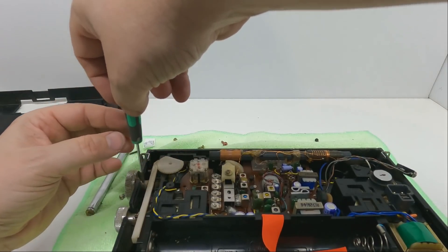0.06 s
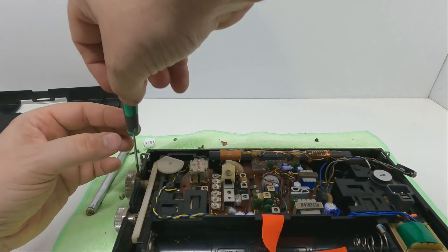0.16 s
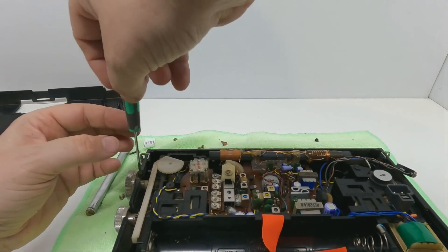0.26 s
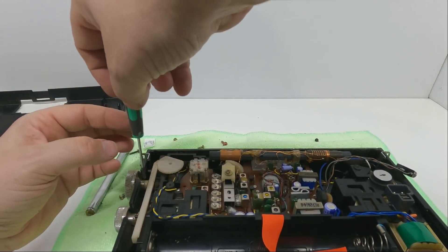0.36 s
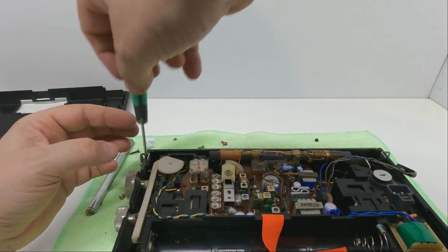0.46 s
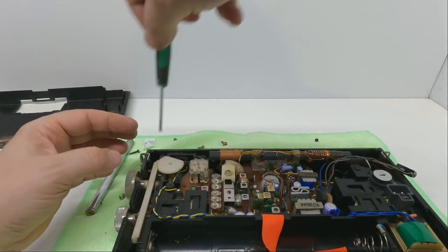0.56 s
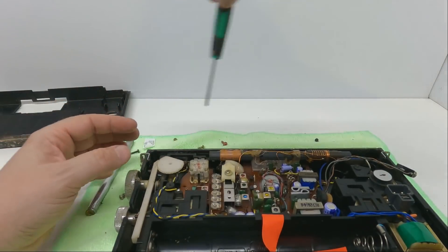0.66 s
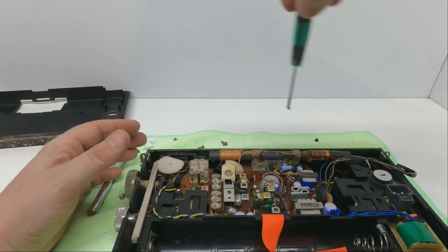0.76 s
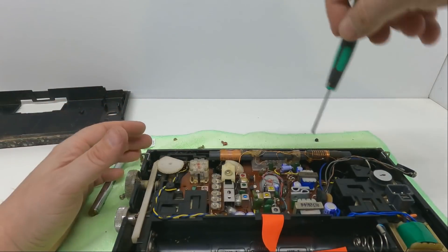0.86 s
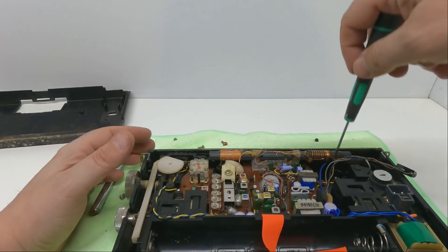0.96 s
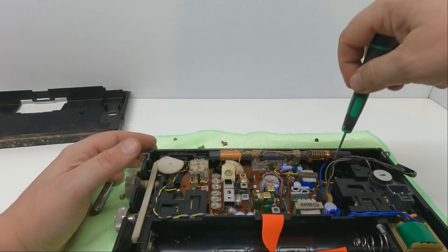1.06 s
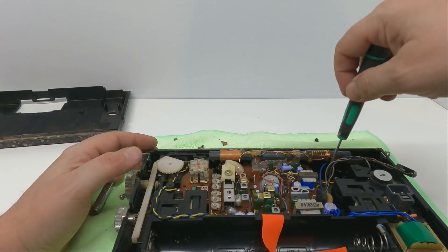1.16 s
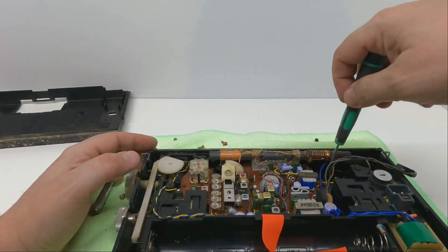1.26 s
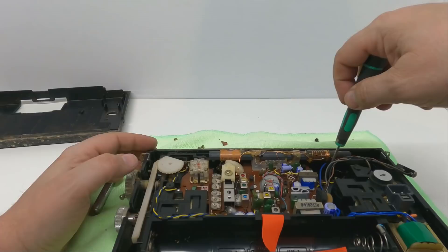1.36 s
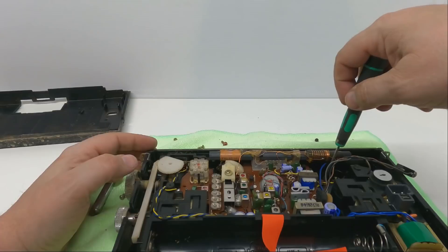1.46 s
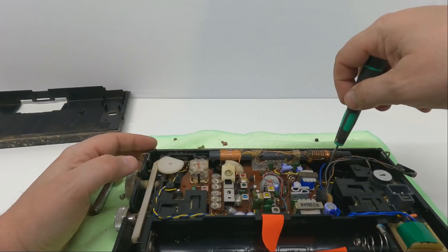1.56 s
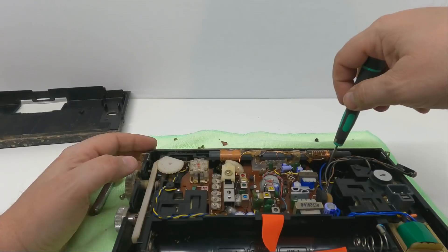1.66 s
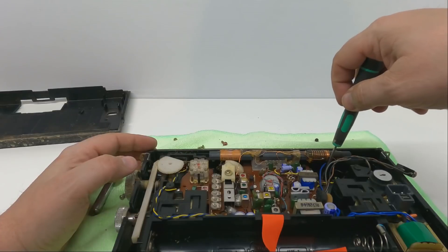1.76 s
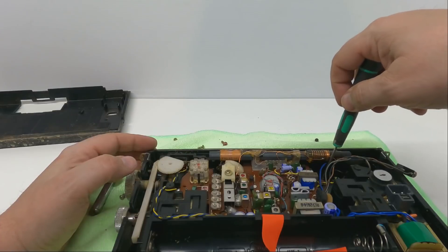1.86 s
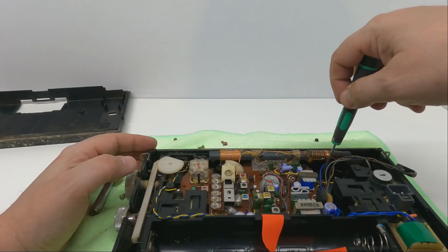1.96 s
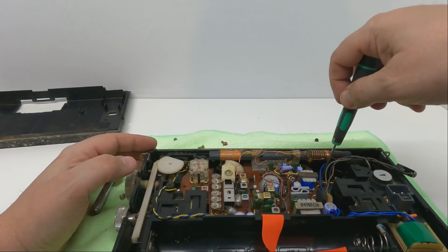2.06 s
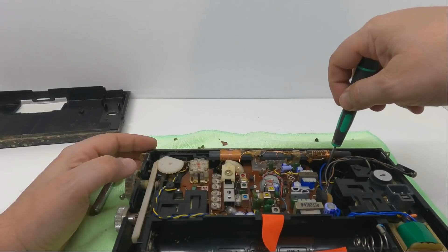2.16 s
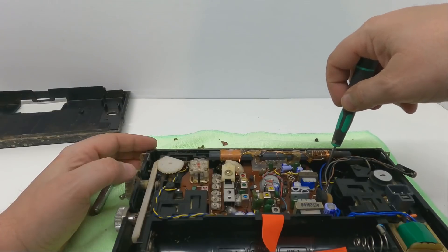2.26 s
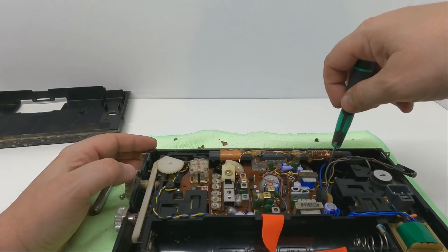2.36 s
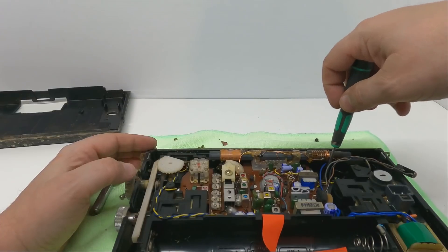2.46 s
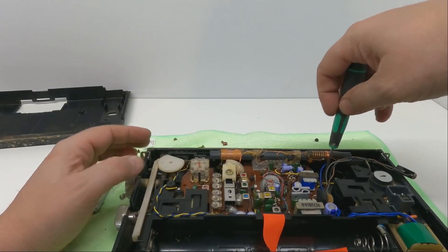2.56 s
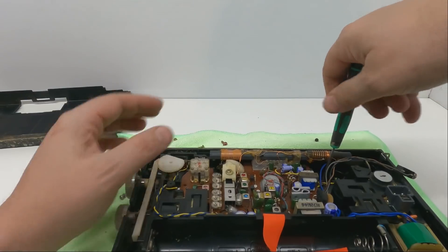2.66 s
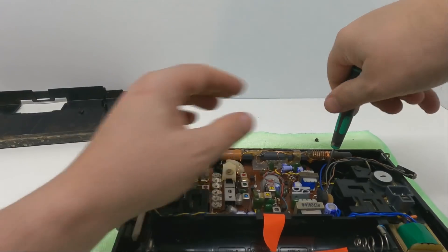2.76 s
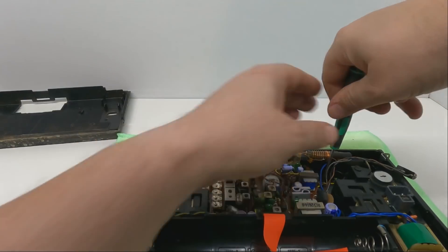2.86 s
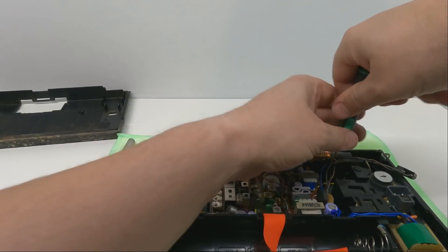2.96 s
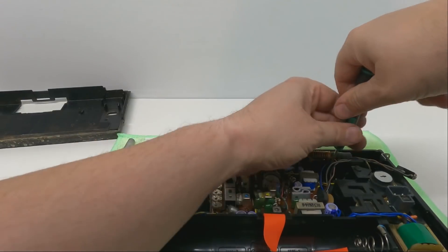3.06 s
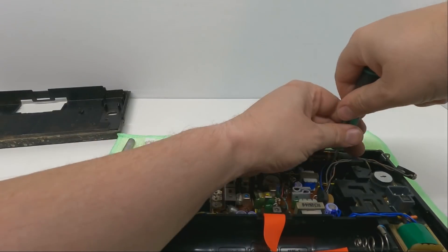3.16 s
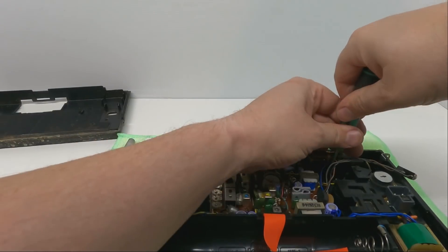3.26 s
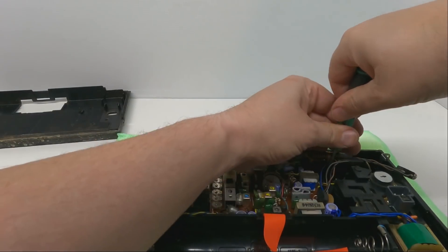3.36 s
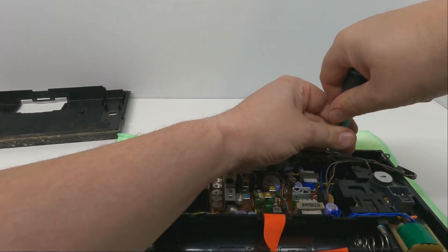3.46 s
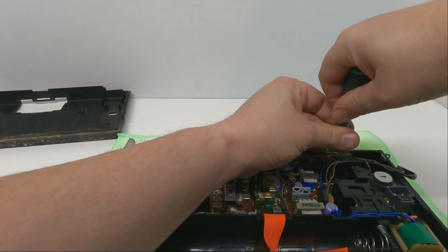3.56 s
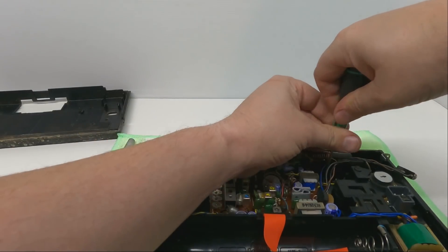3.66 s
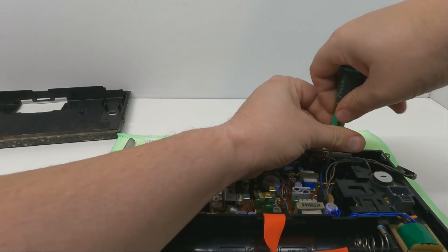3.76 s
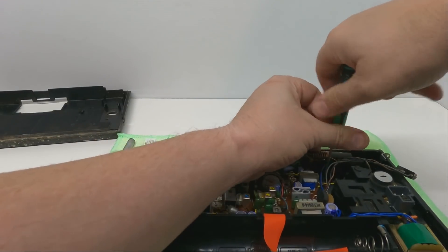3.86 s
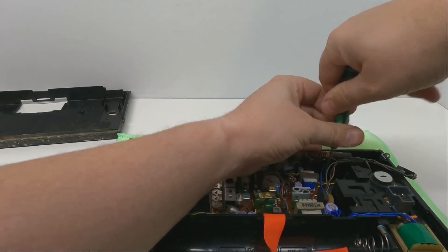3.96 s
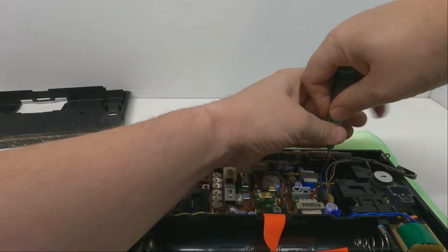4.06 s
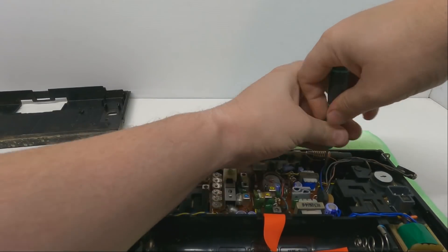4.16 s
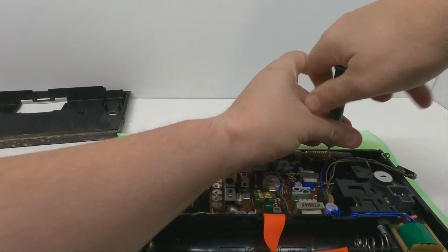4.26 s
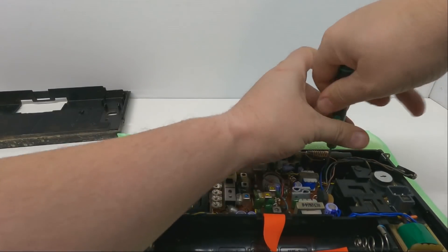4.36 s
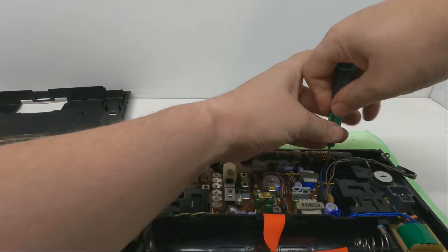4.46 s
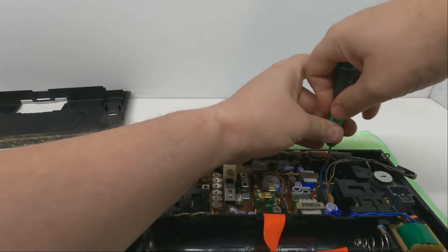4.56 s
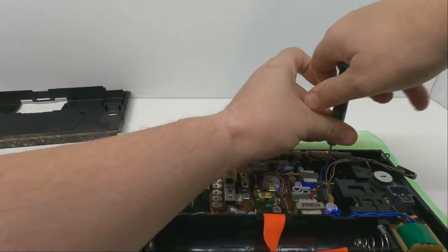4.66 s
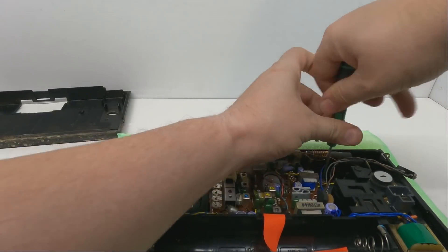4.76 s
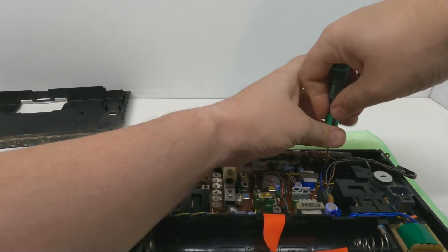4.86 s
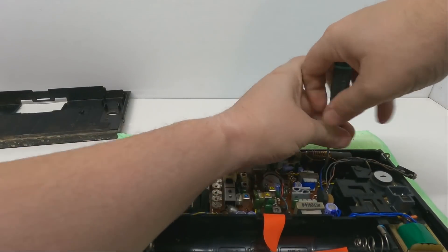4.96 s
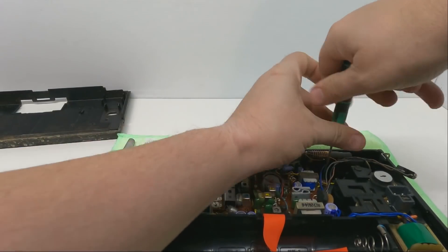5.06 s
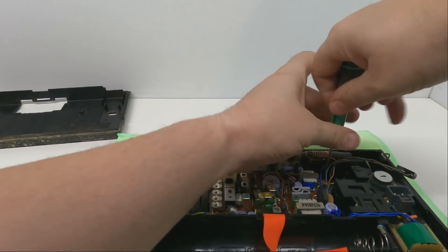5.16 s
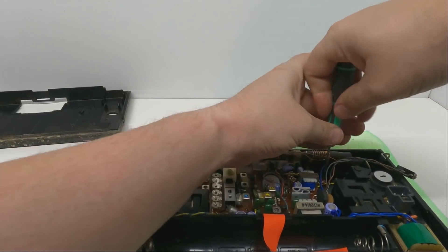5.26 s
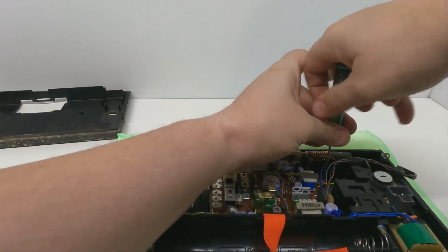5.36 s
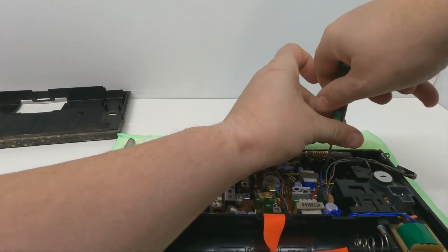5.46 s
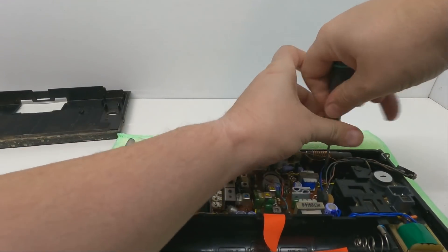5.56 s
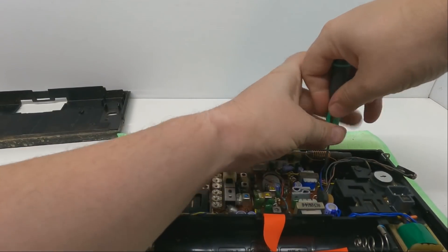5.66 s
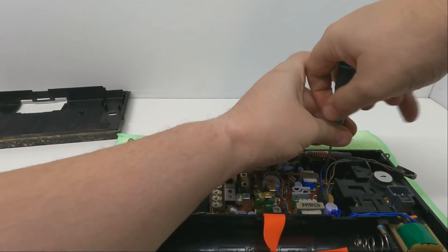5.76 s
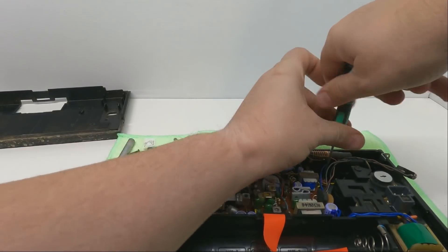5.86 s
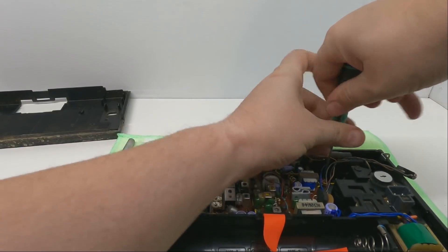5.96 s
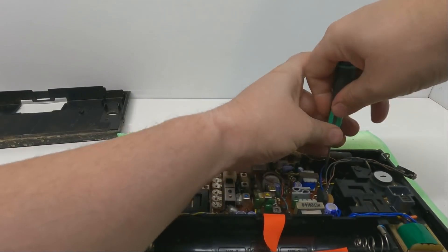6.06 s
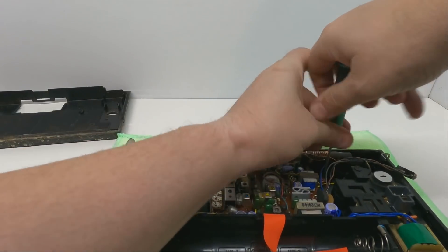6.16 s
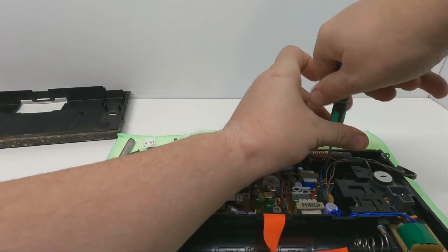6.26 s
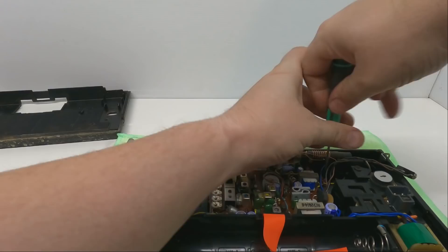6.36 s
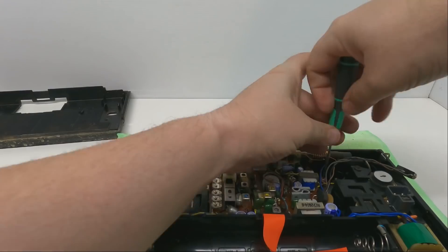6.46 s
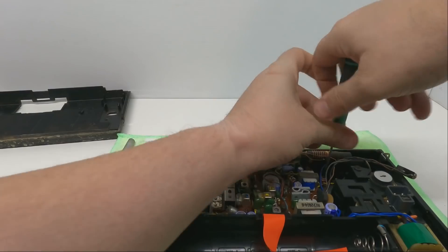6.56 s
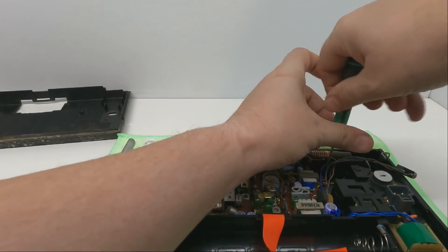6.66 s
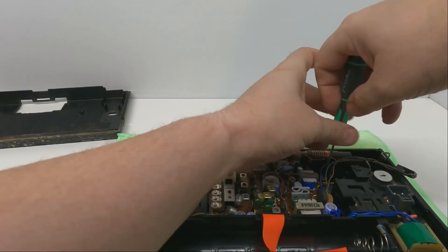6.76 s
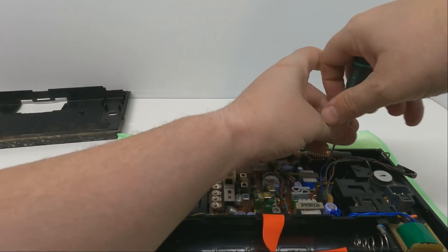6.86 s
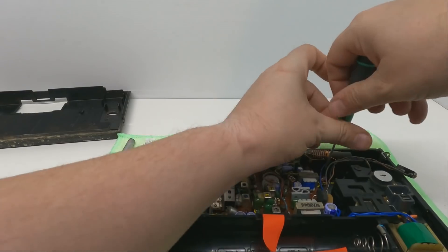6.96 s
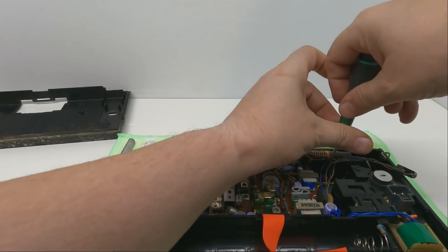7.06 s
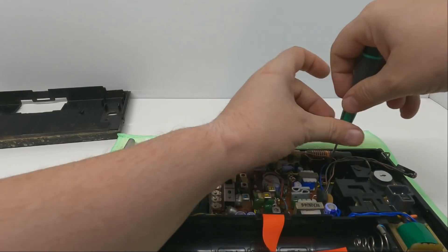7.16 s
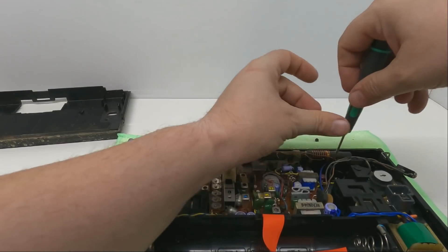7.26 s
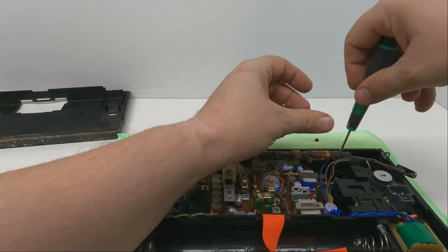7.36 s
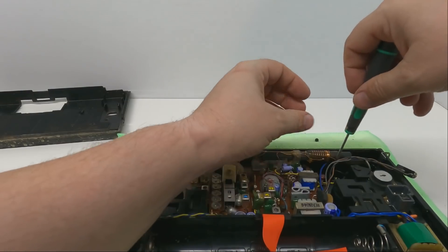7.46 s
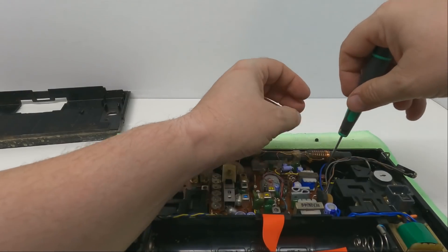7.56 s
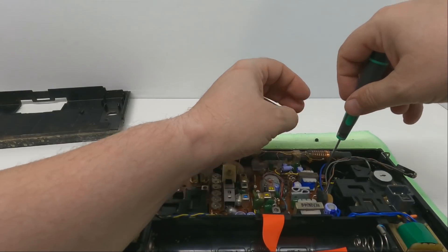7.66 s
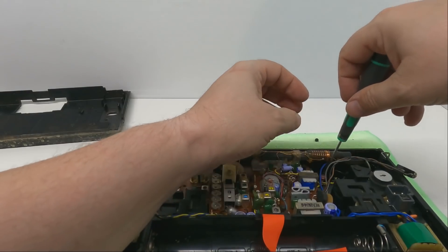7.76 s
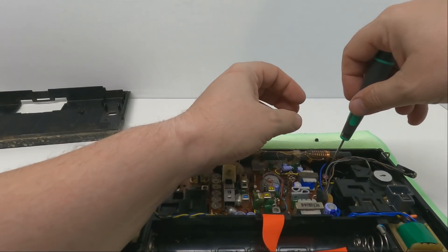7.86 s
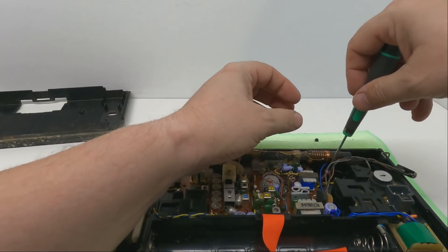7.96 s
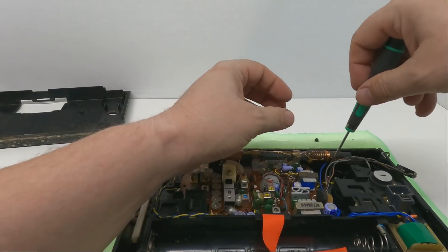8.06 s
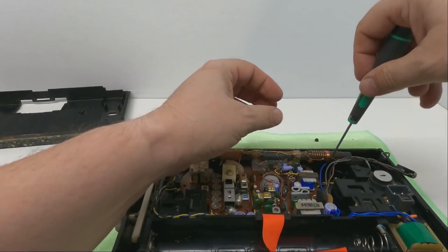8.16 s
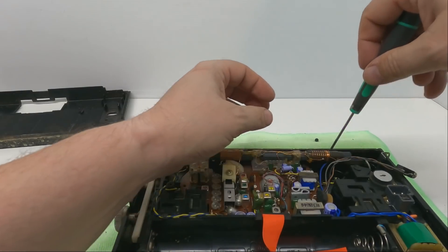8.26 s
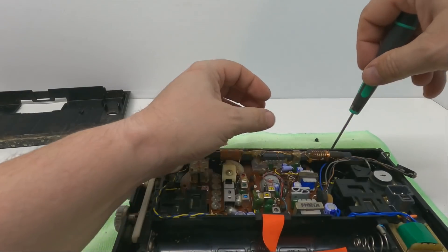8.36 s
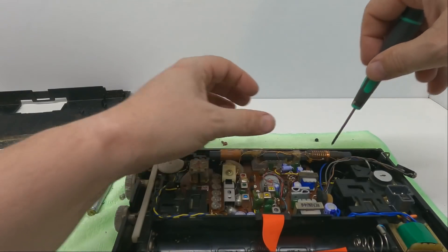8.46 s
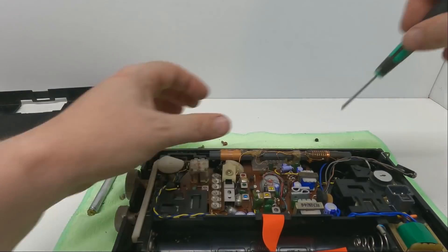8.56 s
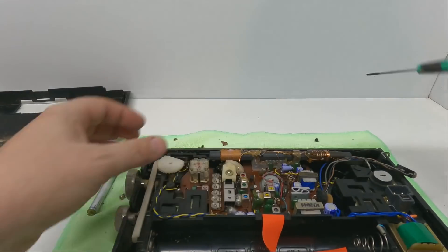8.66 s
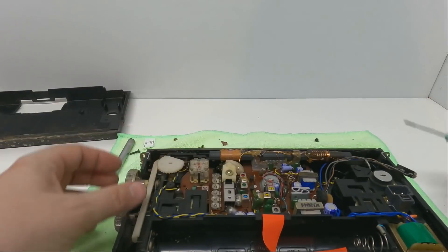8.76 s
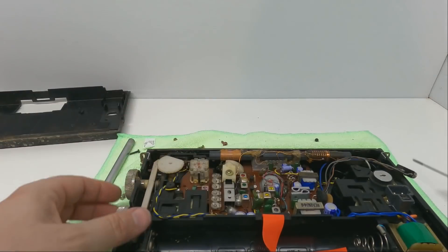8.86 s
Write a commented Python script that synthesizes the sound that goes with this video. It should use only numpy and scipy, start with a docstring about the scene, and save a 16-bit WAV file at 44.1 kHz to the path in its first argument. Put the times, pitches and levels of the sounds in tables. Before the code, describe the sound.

A screwdriver works on an opened plastic radio. A quick cluster of bright metal clinks comes first, then near quiet, a few hollow plastic knocks and two hard cracks. Soft rhythmic finger rubs on the handle follow with faint ticks, dull bumps and one strong clattering knock midway. The rubbing stops, then a short burst of clinks. Close microphone in a small dry room with low drone and hiss.

```python
"""Screwdriver on an opened plastic radio

The blade clinks on small metal parts and knocks the hollow case: short forces drive banks of resonances.
Gritty squeaks and scrapes ring from random impulses; finger strokes are coloured noise and dense tiny slips.
The case shifts and drags on its mat, and struck parts sing on as beating pairs of sines.
A small dry room adds noise-built reflections; behind lie a low drone, hiss, a wavering hum, faint whistles."""
import sys
import numpy as np
from scipy import signal
from scipy.fft import rfft, irfft, next_fast_len
from scipy.io import wavfile
from scipy.ndimage import uniform_filter1d

SR = 44100
rng = np.random.default_rng(int(sys.argv[2]) if len(sys.argv) > 2 else 0)


def transcribe(u):
    """Save the signal u as a 16-bit wav file named by the first command-line argument.

    u: samples, shape (n,) or (channels, n), limited to [-1, 1]; the rate is SR.
    q: integer samples, one column per channel.
    """
    v = np.clip(np.atleast_2d(u).T, -1, 1)
    q = np.round(v * 32767).astype(np.int16)
    wavfile.write(sys.argv[1], SR, q)


N = 392931

# Levels marked nominal get a further trim or wander where they are used.
# room drone: (frequency [Hz], relative density [dB per Hz])
DRONE_SPECTRUM = [(12, -56.5), (20, -29), (48, -17), (60, -10), (81, -2), (94, -2), (103, -19.5),
                  (161, -10.5), (204, -19.5), (233, -18), (386, -24.5), (544, -36), (700, -55), (910, -70),
                  (1540, -120)]
# room hiss: (frequency [Hz], relative density [dB per Hz])
HISS_SPECTRUM = [(400, 7), (700, 0), (900, -1), (1150, 5), (1550, 5), (2200, -4.5), (3400, -12),
                 (4800, -7.5), (7000, -13), (8600, -24), (12000, -34.5), (15000, -38.5)]
# distant motor hum, each line wavering slowly: (frequency [Hz], rms level [dB])
HUM_LINES = [(77, -52.5), (154, -62.5), (192, -69)]
# background whistles: (time [s], length [s], start pitch [Hz], end pitch [Hz], nominal level [dB])
WHISTLES = [(0.0, .12, 5700, 5650, -83), (1.44, .22, 4450, 4850, -83), (1.55, .22, 5520, 5700, -84.5),
            (1.7, .2, 4700, 4550, -82.5), (2.2, .24, 4620, 4500, -81), (2.55, .15, 4470, 4650, -78),
            (2.56, .14, 5750, 6100, -74), (6.53, .12, 4600, 4500, -68), (6.58, .17, 5700, 6050, -72),
            (7.63, .22, 5700, 5750, -79), (8.46, .19, 4610, 4850, -72), (8.5, .17, 5830, 6100, -69)]
# light rubbing between strokes, and the fading rattle after the opening clinks:
# (time [s], nominal treble level [dB])
RUSTLE_CURVE = [(0.0, -91.5), (0.2, -97.5), (0.35, -76), (0.54, -83), (1.66, -94), (2.3, -92), (2.87, -78),
                (3.74, -82.5), (4.16, -70), (4.66, -78), (5.0, -72.5), (5.23, -78), (5.53, -80),
                (5.81, -78), (6.04, -77), (6.99, -74), (7.41, -90), (8.23, -96.5), (8.9, -77.5)]
# case shifting under the weight of the hands: (time [s], nominal rumble level [dB])
LEAN_CURVE = [(0.0, -61.5), (0.37, -65), (1.71, -65), (2.75, -54), (3.84, -57.5), (4.29, -49.5),
              (4.91, -53), (5.28, -50), (5.43, -47.5), (5.67, -55), (6.32, -47.5), (6.59, -50),
              (6.99, -58.5), (7.91, -67), (8.6, -61), (8.9, -62)]
# finger strokes on the handle: (start [s], length [s], nominal skin level [dB], nominal tip level [dB])
STROKES = [(0.6, 0.17, -73.5, -82), (1.0, 0.35, -74, -74), (1.305, 0.085, -69, -64.5),
           (1.901, 0.12, -74, -59.5), (2.58, 0.24, -69, -57), (2.981, 0.21, -69.5, -70),
           (3.171, 0.096, -65, -67), (3.365, 0.081, -73.5, -57), (3.8, 0.28, -66.5, -59.5),
           (4.048, 0.11, -69, -57), (4.185, 0.079, -59, -54), (4.28, 0.2, -63, -53.5),
           (4.52, 0.13, -61, -57), (4.708, 0.11, -57.5, -52), (4.895, .14, -59.5, -54),
           (5.089, 0.085, -60, -54), (5.288, 0.083, -60.5, -57), (5.466, 0.2, -63.5, -58.5),
           (5.699, 0.065, -63, -54.5), (5.86, 0.16, -63.5, -55), (6.081, 0.14, -58.5, -55),
           (6.26, 0.15, -59, -52.5), (6.456, 0.12, -58.5, -53), (6.67, 0.12, -61.5, -58.5),
           (6.8, 0.13, -62, -61), (6.995, 0.16, -64.5, -58), (7.12, 0.18, -71, -62),
           (8.776, 0.1, -73, -62.5)]
# skin on the handle: (frequency [Hz], relative density [dB per Hz])
SKIN_SPECTRUM = [(1200, -34.5), (2200, 1.5), (3400, -1.5), (5400, 3), (7200, -4.5), (8600, -10.5),
                 (12000, -14), (15000, -31.5)]
# blade on the screw, heard through the case: (frequency [Hz], relative density [dB per Hz])
SCRAPE_SPECTRUM = [(350, -14), (600, -7), (760, -15), (900, -15), (1100, -4.5), (1450, -2), (1750, -3.5),
                   (2050, -3), (2700, -12.5), (4200, -18), (7000, -40.5)]
# case shifting under the hands: (frequency [Hz], relative density [dB per Hz])
JOSTLE_SPECTRUM = [(15, 3), (38, 12.5), (60, 6.5), (105, -3), (150, 0), (220, -16), (260, -11.5),
                   (330, -9.5), (430, -24.5), (650, -37.5), (1000, -66)]
# blade on small parts: (time [s], body over 5 ms [dB], snap re body [dB], nominal edge re body [dB],
# favoured resonance [Hz])
CLINKS = [(0.163, -60, 9, 7, 850), (0.1737, -31.5, 10.5, 3.5, 5930), (0.1762, -29, -7, -18, 6000),
          (0.202, -35.5, -0.5, -16, 3530), (0.2274, -41.5, 2.5, -24, 4150), (0.261, -33, 10, -10, 6060),
          (0.2706, -27, -2.5, -15.5, 4100), (0.2838, -48, -1, -22, 2900), (0.297, -29.5, -9, -27, 850),
          (0.3060, -39, -7, -19, 850), (0.312, -45, -7, -20, 4200), (0.3593, -53, 1, -18, 5400),
          (0.3233, -33.5, -10.5, -26, 850), (0.3776, -33, 5, -15, 850), (0.381, -30, -9, -30, 860),
          (0.4013, -34.5, -7, -23, 4160), (0.415, -36.5, 1, -3.5, 3860), (0.509, -53, 12, -16, 6810),
          (0.5152, -52.5, 14, 14, 7050), (0.52, -46, 5.5, -14, 6830), (0.525, -50, 0, -13, 1700),
          (0.5305, -52, -1, -2, 7300), (0.784, -64.5, -5, -10, 2320), (0.875, -55.5, -11.5, -26.5, 1830),
          (0.945, -59.5, -17, -19.5, 1840), (3.402, -58, 0.5, -30, 2880), (3.876, -64.5, 3, -12, 2000),
          (4.523, -54, -9, -26, 2200), (4.722, -69, 5, -11, 5000), (5.669, -67, -3, 5.5, 5960),
          (6.766, -73, -3, -12, 5300), (6.883, -57.5, 0, -18, 4330), (7.203, -56, 6.5, -29, 4960),
          (7.87, -67, 14.5, 8, 5350), (8.208, -53.5, -5, -10, 5360), (8.22, -44.5, 7, -7, 2330),
          (8.227, -36.5, -14, -28, 1400), (8.247, -29.5, 4, -13, 5440), (8.2705, -32.5, -1.5, -39, 5100),
          (8.377, -52, -1, -20, 3500), (8.3827, -37, 2.5, -11, 3800), (8.393, -47.5, 6, -24, 5290),
          (8.398, -41.5, 3, -24, 2430), (8.407, -44.5, 3, -14, 4360), (8.417, -47, 2.5, -19, 3460)]
# blade and touched chassis: (frequency [Hz], width [Hz], level [dB])
PART_MODES = [(846, 78, -8), (1330, 82, 1.5), (1670, 130, -6.5), (2244, 90, -6), (2385, 81, -6.5),
              (2876, 210, -3.5), (3450, 90, -11), (3790, 69, -9.5), (4140, 240, -0.5), (4750, 130, -1.5),
              (5150, 70, -3), (5300, 220, -6), (5420, 170, -4.5), (6050, 220, -4.5), (6900, 220, -7),
              (7360, 300, -7.5), (8170, 200, -12.5), (9700, 1000, -20.5)]
# parts singing on after a blow: (time [s], frequency [Hz], t60 [s], nominal starting level [dB])
RINGS = [(0.176, 1350, .09, -33), (0.298, 851, .09, -43.5), (0.381, 855, .09, -39.5),
         (2.459, 1365, .09, -35), (2.459, 2030, 0.12, -39), (2.459, 2250, 0.15, -44),
         (2.459, 2577, 0.12, -40), (2.459, 2740, 0.11, -37), (2.712, 995, 1.3, -65),
         (2.831, 982, 1.4, -63.5), (5.362, 990, 1.1, -69), (5.363, 2930, 0.083, -34.5),
         (5.363, 3880, .09, -37), (8.249, 1350, .17, -48), (8.249, 2780, 0.073, -44),
         (8.384, 3440, .09, -41)]
# blade knocking the case: (time [s], body over 5 ms [dB], snap re body [dB], nominal thump re body [dB],
# push decay [s], favoured resonance [Hz])
KNOCKS = [(0.1776, -31.5, -15, -19.5, 0.00022, 1310), (1.8866, -38, -12.5, 1.5, 0.00053, 2000),
          (2.003, -57, -13, 4, .0004, 1300), (2.273, -28, -19.5, -0.5, 0.00089, 1310),
          (2.44, -48.5, -18, -2, .0002, 1320), (2.452, -28.5, -16, -9.5, 0.00031, 1315),
          (2.458, -23.5, 0.5, 1, 0.0023, 2200), (2.461, -28.5, -8, -6, .0003, 2050),
          (2.7099, -32, -6.5, -10, 0.00035, 940), (2.7121, -14.5, -7.5, 0.5, 0.0013, 1254),
          (2.826, -51.5, -15.5, -14, .0002, 940), (2.8312, -16.5, -7.5, -3.5, 0.00058, 1053),
          (3.579, -54.5, -21, 13.5, .0002, 925), (3.615, -30.5, -4.5, 1.5, 0.00021, 2270),
          (3.905, -59.5, -10, 22.5, .0002, 755), (3.9379, -48.5, -11, 13.5, 0.00019, 2010),
          (4.009, -57, -19, 18.5, 0.00022, 755), (4.132, -59.5, -1, 16, .0002, 1650),
          (4.345, -41.5, -13, -7, .0002, 1990), (4.476, -39, -14, 0, 0.00025, 1470),
          (5.0545, -37.5, -16, 14.5, 0.005, 920), (5.0736, -44, -8, 13.5, 0.0053, 1972),
          (5.344, -37, -19.5, 15.5, .0029, 1450), (5.3525, -35.5, -4, -5.5, .002, 1900),
          (5.356, -27, -6.5, -15.5, .004, 1500), (5.3612, -23, 0, 9, .0024, 6715),
          (5.3636, -19.5, -5.5, -9.5, 0.0002, 1506), (5.371, -32.5, -3, -3, .0002, 2900),
          (5.401, -41, -4, -3, .0003, 1450), (6.185, -32, -18.5, 6, 0.00071, 1430),
          (6.52, -48, -8, 8, 0.00022, 1474), (6.555, -46, -16, 6, 0.0002, 748),
          (6.619, -44, -16, -17, .0002, 1438), (6.824, -51, -25, 12.5, 0.00017, 755),
          (6.9624, -46.5, -5.5, -5, .0002, 755), (6.976, -41, -15, 6, 0.00027, 755),
          (6.985, -41, -20, 3, 0.00018, 755), (7.116, -49, -29, 6, 0.00017, 756),
          (8.704, -50.5, -9.5, 4.5, 0.00018, 930)]
# case walls: (frequency [Hz], width [Hz], level [dB])
WALL_MODES = [(766, 45, -12), (940, 37, -2.5), (1333, 150, 3.5), (1525, 170, 2), (1910, 130, -12.5),
              (2295, 40, -5.5), (2608, 50, -16), (2850, 130, -11), (3240, 150, -17.5), (3810, 230, -11),
              (4770, 390, -12.5), (5630, 160, -18), (6500, 660, -16.5), (7280, 100, -18),
              (9200, 8300, -37.5)]
# whole case rocking and flexing on the mat: (frequency [Hz], width [Hz], level [dB])
CASE_MODES = [(41.5, 20, 2), (90.5, 25, -5), (140.3, 13, 3), (260, 29, -12.5), (327, 19, -6),
              (502, 15, -13.5)]
# air in the open shell: (frequency [Hz], width [Hz], level [dB])
HOLLOW_MODES = [(345, 25, -2), (490, 50, -8), (650, 90, -17), (750, 110, -10)]
# screw squeaks, case scrapes and tails after knocks:
# (time [s], length [s], rms level [dB], resonance [Hz], resonance width [Hz])
GRITTY_TONES = [(1.924, 0.066, -65.5, 2300, 180), (2.059, 0.027, -60, 2340, 300),
                (2.02, 0.34, -76, 2250, 140), (2.274, 0.28, -74.5, 2280, 170), (2.287, 0.14, -56, 335, 18),
                (2.448, 0.075, -48.5, 322, 12), (2.533, 0.22, -61, 362, 40),
                (2.466, 0.043, -48.5, 2300, 300), (2.468, 0.036, -50, 2720, 180),
                (2.501, .22, -70.5, 2236, 160), (3.858, 0.32, -57, 290, 100),
                (3.863, 0.19, -61.5, 2060, 220), (3.919, 0.4, -64.5, 1620, 110),
                (4.198, 0.054, -58, 2080, 230), (4.401, .035, -59, 2000, 180),
                (4.577, 0.055, -61, 2050, 220), (5.113, 0.035, -59.5, 2080, 220),
                (4.748, 0.055, -55, 1510, 140), (4.736, 0.066, -56.5, 2080, 230),
                (4.959, 0.041, -53, 1430, 130), (5.108, 0.055, -59, 1440, 250),
                (5.352, 0.06, -41.5, 340, 64), (5.338, 0.028, -35, 1520, 160),
                (5.386, 0.1, -56.5, 1480, 450), (5.354, 0.058, -43, 2900, 500),
                (5.359, 0.058, -45.5, 3900, 700), (5.398, 0.094, -56.5, 2950, 2000),
                (6.309, 0.087, -59, 1300, 290), (6.505, 0.095, -55.5, 1290, 260),
                (6.655, 0.27, -60.5, 1370, 120), (6.802, 0.13, -59.5, 740, 110),
                (6.965, 0.042, -42, 320, 40), (7.022, 0.16, -61.5, 734, 110),
                (8.799, 0.078, -65, 2110, 250)]
# soft fingertip bumps: (time [s], level over 5 ms [dB])
BUMPS = [(3.437, -31.5), (3.456, -34.5), (3.581, -41), (3.619, -30), (3.654, -37), (3.938, -42),
         (4.156, -34.5), (4.183, -33.5), (4.524, -36), (4.82, -37), (6.826, -52), (6.981, -36.5)]
# case dragging on the mat: (time [s], length [s], nominal level at mid-drag [dB])
DRAGS = [(3.797, 0.26, -56.5), (3.98, 0.36, -56), (5.401, 0.038, -46), (6.188, 0.33, -56.5),
         (6.69, 0.43, -57), (6.957, 0.51, -61)]
# soft mat under the case: (frequency [Hz], relative density [dB per Hz])
MAT_SPECTRUM = [(150, -13), (300, 4), (430, -2), (560, -5.5), (780, -12), (1000, -18.5), (1600, -44)]

DRONE_DB, HISS_DB = -54, -68.5
WHISTLE_ARCH_HZ, WHISTLE_WIDTH_HZ = 111.3, 120  # mid-way rise; airy bandwidth
RUSTLE_SKIN_DB, RUSTLE_TIP_DB = 6.5, 9  # re the rustle curve
LEAN_DB = 8  # re the lean curve
STROKE_SKEW = 0.93  # below 1 the stroke peaks early
GRIP_SHIFT_DB, TIP_SHIFT_DB = 0.5, 3  # wander of skin and tip colour
TICKS_PER_S, TICK_DB = 40, -10  # tip catches; level re the tip gain
BLOW_S, HIT_SAMPLES = .005, 16384
CLINK_PAN_DB, KNOCK_PAN_DB = -0.7, -2.5  # left minus right
BOUNCE_S, BOUNCE_DB = 0.0072, -19  # mean delay; level re first touch
PART_DETUNE = .012  # spread, share of frequency
RING_SPLIT = 0.0066  # greatest spacing of a pair, share of frequency
KNOCK_BUZZ_DB = -14.5  # re body
EDGE_DB, EDGE_PER_SNAP = -13.5, 1.8  # a harder contact lifts the top octave faster than the snap
BUMP_HZ, BUMP_PUSH_S = 147, 0.00098  # flexing of the back; time to peak force
SHADE_LOW_HZ, SHADE_HIGH_HZ, SHADE_SHARE = 502.7, 1600, .22  # band radiated more to the right
TOP_HZ = 15800


def undb(db):
    """Decibels to gain."""
    return 10 ** (np.asarray(db) / 20)


def unit(x):
    """Scale to rms 1."""
    return x / np.sqrt(np.mean(x ** 2))


def band(x, edges_hz, kind, order=3):
    """Causal Butterworth filter."""
    return signal.sosfilt(signal.butter(order, edges_hz, kind, fs=SR, output="sos"), x)


def colour(x, spectrum):
    """Filter by (Hz, dB) points joined on a log frequency axis; rms 1."""
    hz, db = np.transpose(spectrum)
    size = next_fast_len(N)
    f = np.fft.rfftfreq(size, 1 / SR) + 1
    gain = undb(np.interp(np.log(f), np.log(hz), db))
    return unit(irfft(rfft(x, size) * gain, size)[..., :N])


def walk(rate_hz):
    """Smooth random wandering, rms 1."""
    k = int(SR / rate_hz)
    steps = np.repeat(rng.standard_normal(N // k + 1), k)
    return unit(uniform_filter1d(steps, k)[:N])


def curve(rows):
    """Gain along a curve of (s, dB) points."""
    return undb(np.interp(np.arange(N) / SR, *np.transpose(rows)))


def add(out, x, s, pan_db):
    """Mix a mono or stereo sound into both channels at time s."""
    i = int(s * SR)
    pan = undb(np.array([[pan_db], [-pan_db]]) / 2)
    out[:, i:i + x.shape[-1]] += pan * x[..., :N - i]


def ring(force, modes, scatter_db, sense=-1):
    """Drive randomly weighted resonances; neighbours swing oppositely (sense -1) or together (1)."""
    f = np.fft.rfftfreq(HIT_SAMPLES, 1 / SR) + 1e-6
    hz, width, db = np.transpose(modes)[:, :, None]
    weight = undb(db + scatter_db * rng.standard_normal(db.shape))
    weight = weight * sense ** np.arange(len(hz))[:, None]
    response = np.sum(weight / (1 + 1j * (f / hz - hz / f) * hz / width), axis=0)
    return irfft(rfft(force) * response)


def blow(x, db):
    """Scale a hit so that its energy equals that of db held for one blow length."""
    return x * undb(db) * np.sqrt(BLOW_S * SR / np.sum(x ** 2))


def contact(travel_s, rebound):
    """A sharp touch smeared by bending waves crossing the part: four allpass echoes, flat spectrum."""
    f = np.fft.rfftfreq(HIT_SAMPLES, 1 / SR)
    lag = np.round(travel_s * SR * (.5 + rng.random((4, 1)))) + 1
    delay = np.exp(-2j * np.pi * f * lag / SR)
    return irfft(np.prod((delay - rebound) / (1 - rebound * delay), axis=0))


def harden(x, db, snap_db, edge_db):
    """Set body, snap and edge of a hit; a harder contact brightens body and snap, a soft one dulls them."""
    body_top_hz = np.clip(3200 * 2 ** (snap_db / 30), 2200, 2600)
    snap_top_hz = np.clip(13000 * 2 ** (snap_db / 11), 3500, 7300)
    body = band(x, [600, body_top_hz], "bandpass", order=4)
    snap = band(band(x, 2600, "highpass", order=5), snap_top_hz, "lowpass", order=4)
    edge = band(x, [7800, 12500], "bandpass")
    return blow(body, db) + blow(snap, db + snap_db) + blow(edge, db + edge_db - 1.5)


def favour(modes, centre_hz, boost_db):
    """The struck spot brings out the resonances near one frequency."""
    hz, width, db = np.transpose(modes)
    nearness = np.exp(-(np.log(hz / centre_hz) / 0.16) ** 2)
    return np.transpose([hz, width, db + boost_db * nearness])


def detune(modes):
    """Each touch meets another spot or part, so its resonances lie a little higher or lower."""
    hz, width, db = np.transpose(modes)
    return np.transpose([hz * (1 + PART_DETUNE * rng.standard_normal(len(hz))), width, db])


def buzz(decay_s, dull_hz):
    """Loose parts chatter on after a hit: grainy noise that dies away."""
    t = np.arange(HIT_SAMPLES) / SR
    grains = rng.standard_normal(HIT_SAMPLES) * undb(0.58 * rng.standard_normal(HIT_SAMPLES))
    grains = band(band(grains, dull_hz, "lowpass", order=1), 440, "highpass", order=2)
    return grains * np.exp(-t / decay_s) * np.minimum(t / 0.0033, 1)


def friction(spectrum, slips_per_s, spread_db, smooth_db, side_db):
    """Dense tiny slips of uneven size over a smooth hiss, coloured by the rubbing body."""
    count = int(slips_per_s * N / SR)
    place, size, sign = rng.random((count, 3)).T
    size_db = spread_db * np.minimum(-np.log(1 - size), 4)
    slips = np.zeros(N)
    slips[(place * N).astype(int)] = np.sign(sign - .5) * undb(size_db)
    mid = colour(unit(slips) + undb(smooth_db) * rng.standard_normal(N), spectrum)
    side = undb(side_db) * colour(rng.standard_normal(N), spectrum)
    return np.array([mid + side, mid - side])


def background():
    """A low drone, nearly alike in both channels, under a faint wide hiss."""
    noise = rng.standard_normal((4, N))
    sides = np.array([[1], [-1]])
    drone = colour(noise[0], DRONE_SPECTRUM) + sides * undb(-13.5) * colour(noise[1], DRONE_SPECTRUM)
    hiss = colour(noise[2], HISS_SPECTRUM) + sides * undb(-2.5) * colour(noise[3], HISS_SPECTRUM)
    return drone * undb(DRONE_DB + 1.6 * walk(14)) + hiss * undb(HISS_DB + .5 * walk(14))


def hum():
    """Motor hum: each line wavers slowly in level and pitch."""
    out = np.zeros(N)
    for hz, db in HUM_LINES:
        phase = 2 * np.pi * np.cumsum(hz * (1 + .015 * walk(5.5))) / SR
        out += unit(np.sin(phase) * undb(5.6 * walk(6))) * undb(db)
    return out


def whistles():
    """Faint thin whistles: narrow noise on a gliding, arching carrier."""
    out = np.zeros((2, N))
    for s, length_s, start_hz, end_hz, db in WHISTLES:
        u = np.linspace(0, 1, int(length_s * SR))
        arch = np.sin(np.pi * u)
        hz = start_hz + (end_hz - start_hz) * u + WHISTLE_ARCH_HZ * arch
        phase = 2 * np.pi * np.cumsum(hz) / SR
        air = band(rng.standard_normal((2, SR)), WHISTLE_WIDTH_HZ, "lowpass", order=2)[:, :len(u)]
        tone = air[0] * np.cos(phase) + air[1] * np.sin(phase)
        add(out, unit(tone * arch) * undb(db - 2.5), s, 0)
    return out


def effort():
    """Each stroke swells and lets go in one arch, over the rustle curve; returns skin and tip gains."""
    t, rustle = np.arange(N) / SR, curve(RUSTLE_CURVE)
    skin, tip = rustle * undb(RUSTLE_SKIN_DB), rustle * undb(RUSTLE_TIP_DB)
    for start_s, length_s, skin_db, tip_db in STROKES:
        during = (t > start_s) & (t < start_s + length_s)
        arch = np.sin(np.pi * ((t[during] - start_s) / length_s) ** STROKE_SKEW)
        skin[during] = np.hypot(skin[during], arch * undb(skin_db))
        tip[during] = np.hypot(tip[during], arch * undb(tip_db))
    return skin, tip


def shifting(x, depth_db, size=5):
    """As the contact moves, resonances of the rubbed body come and go within hundredths of a second."""
    bands = signal.stft(x, nperseg=512)[2]
    chance = rng.standard_normal(bands.shape[1:])
    wander = unit(uniform_filter1d(uniform_filter1d(chance, size, axis=0), size, axis=1))
    moved = signal.istft(bands * undb(depth_db * wander), nperseg=512)[1][:, :N]
    return unit(moved) * x.std()


def ticks():
    """The tip catches at random and ticks the case walls; rms 1."""
    catches = (rng.random(N) < TICKS_PER_S / SR) * undb(3.0 * rng.standard_normal(N))
    wall = ring(contact(travel_s=0.00025, rebound=0.43), WALL_MODES, scatter_db=0.5)
    wall = band(wall, [900, 4500], "bandpass", order=2)
    return unit(signal.fftconvolve(catches, wall)[:N])


def hands():
    """Fingers twirl the handle, the tip scrapes the screw, the case shifts; returns rustle and rumble."""
    skin_gain, tip_gain = effort()
    grip = walk(120)  # catches and lets go many times within a stroke
    skin = friction(SKIN_SPECTRUM, slips_per_s=1700, spread_db=1.5, smooth_db=0, side_db=-10.5)
    skin = shifting(skin, GRIP_SHIFT_DB) * skin_gain * undb(2.86 * grip)
    grit = friction(SCRAPE_SPECTRUM, slips_per_s=450, spread_db=2.5, smooth_db=-3, side_db=-9)
    scrape = shifting(grit, TIP_SHIFT_DB) * undb(2.2 * grip - 1.5)
    rumble = friction(JOSTLE_SPECTRUM, slips_per_s=400, spread_db=2.0, smooth_db=0.5, side_db=-20)
    rumble = rumble * curve(LEAN_CURVE) * undb(LEAN_DB)
    return skin + (scrape + undb(TICK_DB) * ticks()) * tip_gain, rumble


def clinks():
    """Steel touches small parts: bright, brief, with almost no weight behind it; each part bounces once."""
    out = np.zeros((2, N))
    for s, db, snap_db, edge_db, main_hz in CLINKS:
        touch = contact(travel_s=.0005, rebound=0.61)
        modes = favour(detune(PART_MODES), main_hz, boost_db=8.5)
        parts = harden(ring(touch, modes, scatter_db=4.0), db, snap_db, edge_db)
        case = band(ring(touch, CASE_MODES, scatter_db=1.5), [150, 700], "bandpass", order=2)
        loose = buzz(decay_s=0.026, dull_hz=4500)
        add(out, parts + blow(case, db - 16.5), s, CLINK_PAN_DB)
        add(out, parts * undb(BOUNCE_DB), s + BOUNCE_S * (.5 + rng.random()), CLINK_PAN_DB)
        add(out, harden(loose, db - 9.0, snap_db - 4.5, edge_db - 11.5), s, 0)
    return out


def rings():
    """Screw, springs and chassis tabs outlast the blow: close mode pairs that beat as they decay."""
    out, t = np.zeros((2, N)), np.arange(SR) / SR
    for s, hz, t60_s, db in RINGS:
        second_hz = hz * (1 + RING_SPLIT * rng.uniform(-0.84, 1))
        pair = np.sin(2 * np.pi * hz * t) + .5 * np.sin(2 * np.pi * second_hz * t)
        fade = undb(-60 * t / t60_s)
        add(out, pair * fade * undb(db - 0.5), s, 0)
    return out


def knocks():
    """The blade knocks the case: after a faint noisy lead-in, walls crack, the case thumps, contents buzz."""
    out, t = np.zeros((2, N)), np.arange(HIT_SAMPLES) / SR
    for s, db, snap_db, thump_db, push_s, main_hz in KNOCKS:
        edge_db = EDGE_DB + EDGE_PER_SNAP * snap_db
        modes = favour(WALL_MODES, main_hz, boost_db=9.0)
        lead_in = ring(rng.standard_normal(HIT_SAMPLES) * t * (t < .009), modes, scatter_db=2.0)
        walls = ring(contact(travel_s=0.0002, rebound=0.6), modes, scatter_db=5.5)
        # a long push rocks the whole case, a short one flexes its back
        thump = ring(np.exp(-t / push_s), CASE_MODES, scatter_db=1, sense=1)
        thump = band(thump, 560, "lowpass", order=4)
        hollow = ring(contact(travel_s=0.00039, rebound=0.49), HOLLOW_MODES, scatter_db=2.0)
        hollow = band(hollow, [230, 1000], "bandpass", order=2)
        # the buzz comes from all over the case and differs between channels
        mid, side = (harden(buzz(decay_s=0.036, dull_hz=3560), db + KNOCK_BUZZ_DB, snap_db, edge_db - 0.5)
                     for _ in range(2))
        # the lead-in is stronger when the snap is stronger
        lead_in = harden(lead_in, db - 14.5 + 0.54 * snap_db, snap_db - 5.5, edge_db)
        add(out, lead_in, s - .008, KNOCK_PAN_DB)
        # a heavier thump sounds the hollow more
        crack = harden(walls, db, snap_db, edge_db) + blow(hollow, db - 15.0 + 1.1 * thump_db)
        add(out, crack, s, KNOCK_PAN_DB)
        add(out, mid + undb(-5.5) * side * np.array([[1], [-1]]), s, 0)
        add(out, blow(thump, db + thump_db + 0.6), s + 0.0005, 0)
    return out


def gritty_tones():
    """Screw squeaks, case scrapes and knock tails: uneven random impulses ring one main resonance."""
    out, t = np.zeros((2, N)), np.arange(HIT_SAMPLES) / SR
    for s, length_s, db, main_hz, width_hz in GRITTY_TONES:
        grains = (rng.random(HIT_SAMPLES) < 260 / SR) * undb(2.8 * rng.standard_normal(HIT_SAMPLES))
        arch = np.sin(np.pi * np.minimum(t / length_s, 1))
        force = (grains + 0.0081 * rng.standard_normal(HIT_SAMPLES)) * arch
        modes = [(main_hz, width_hz, 0), (1420, 280, -26)]
        tone = ring(force, modes, scatter_db=5.5)
        tone = band(tone, [0.18 * main_hz, 1.9 * main_hz], "bandpass", order=1)
        add(out, blow(tone, db) * np.sqrt(length_s / BLOW_S), s, 0)
    return out


def bumps():
    """A soft fingertip flexes the case without any crack, too lightly to rock it."""
    out, t = np.zeros((2, N)), np.arange(HIT_SAMPLES) / SR
    for s, db in BUMPS:
        push = t * np.exp(-t / BUMP_PUSH_S)
        thump = ring(push, CASE_MODES + [(BUMP_HZ, 55, 8)], scatter_db=5.5)
        add(out, blow(band(thump, [115, 400], "bandpass"), db), s, 0)
    return out


def drags():
    """Pushed by the hands, the case judders over the mat with a dull, gritty rub."""
    t, gain = np.arange(N) / SR, np.zeros(N)
    for s, length_s, db in DRAGS:
        gain += undb(db) * np.sin(np.pi * np.clip((t - s) / length_s, 0, 1))
    return friction(MAT_SPECTRUM, slips_per_s=250, spread_db=3.5, smooth_db=-5, side_db=-10.5) * gain


def shade(x):
    """Shift the middle band of the hits from left to right, as the walls radiate it."""
    middle = band(x.mean(axis=0), [SHADE_LOW_HZ, SHADE_HIGH_HZ], "bandpass", order=2)
    return x + SHADE_SHARE * middle * np.array([[-1], [1]])


def room(x, early_db, early_s, tail_db, t60_s, treble_t60_s):
    """Quick reflections from the table and near walls, then the short tail of a small room."""
    t = np.arange(SR // 2) / SR
    noise = rng.standard_normal((3, 2, len(t)))
    early = noise[0] * np.exp(-t / early_s) * (t > .002)
    low = band(noise[1], 4000, "lowpass", order=1) * undb(-60 * t / t60_s)
    high = band(noise[2], 4000, "highpass", order=1) * undb(-60 * t / treble_t60_s)
    tail = (low + high) * np.clip(t / 0.0062, 0, 1) ** 2
    response = (unit(early) * undb(early_db) + unit(tail) * undb(tail_db)) / np.sqrt(len(t))
    # so small a body radiates little bass into the room
    radiated = band(x.mean(axis=0), 350, "highpass", order=2)
    return x + signal.fftconvolve(radiated[None], response, axes=1)[:, :N]


def scene():
    """Handling sounds in the room, over its background."""
    rustle, rumble = hands()
    near = shade(clinks() + knocks()) + rings() + gritty_tones() + bumps() + drags() + rustle
    # work lies slightly right: an allpass delays the left by half a sample (exact at low frequency)
    near = np.array([signal.lfilter([1 / 3, 1], [1, 1 / 3], near[0]), near[1]])
    handled = room(near, early_db=-7, early_s=0.0022, tail_db=-16.5, t60_s=0.15, treble_t60_s=0.17)
    return handled + rumble + background() + hum() + whistles()


def record(dry):
    """The microphone drops the deepest rumble and the highest treble."""
    low_cut = band(dry, 31, "highpass", order=2)
    return signal.sosfilt(signal.ellip(8, .2, 70, TOP_HZ, fs=SR, output="sos"), low_cut)


dry = scene()
out = record(dry)
transcribe(out)
```